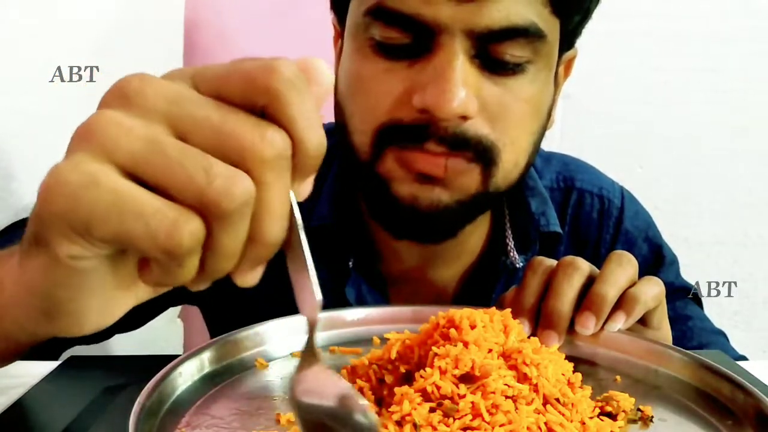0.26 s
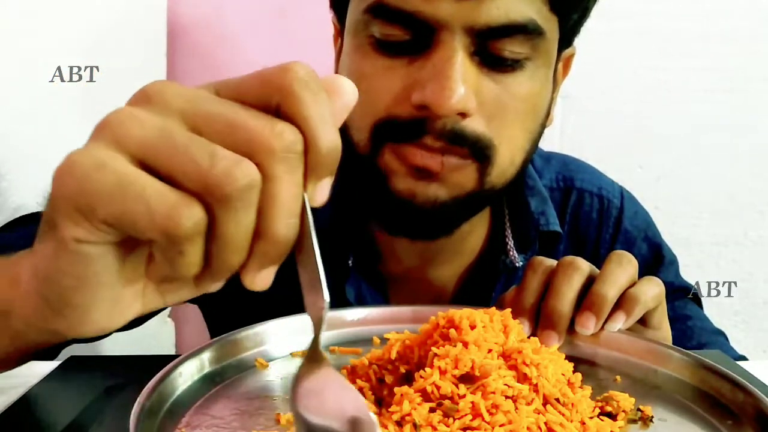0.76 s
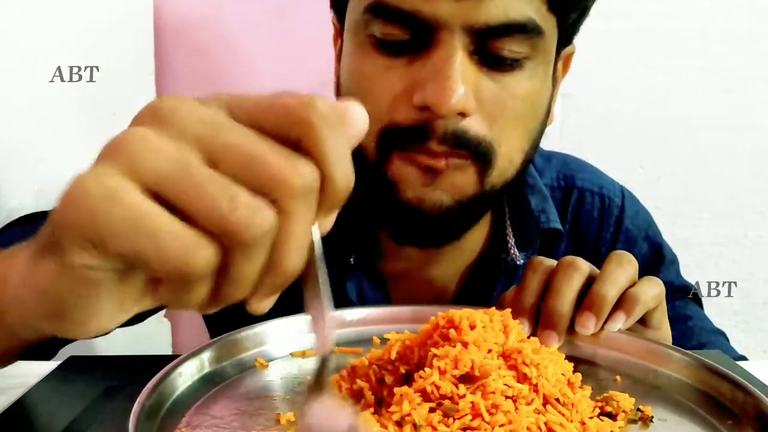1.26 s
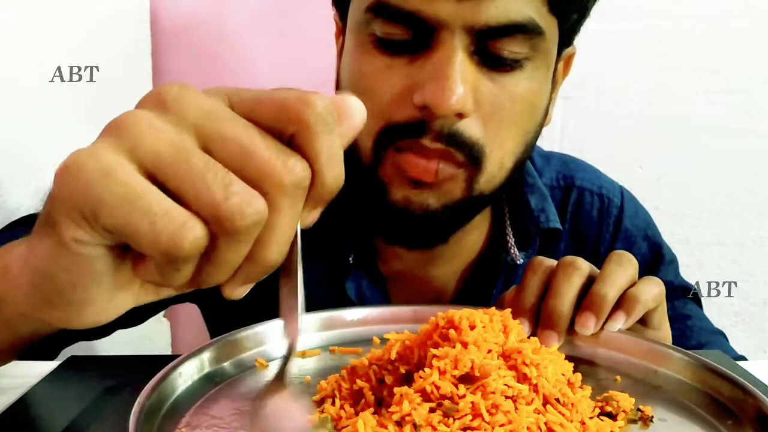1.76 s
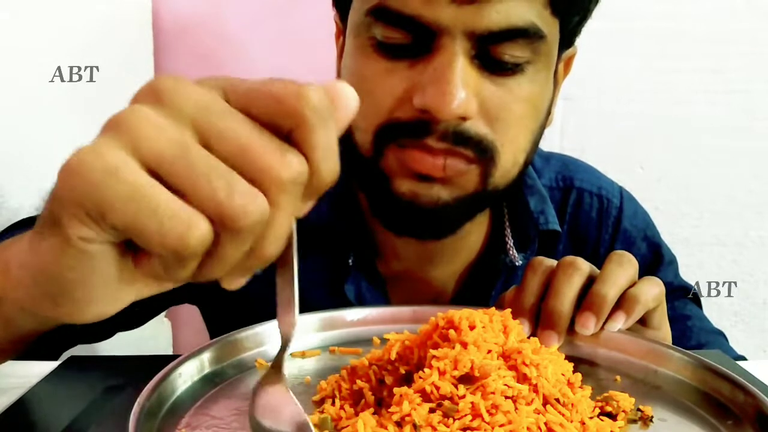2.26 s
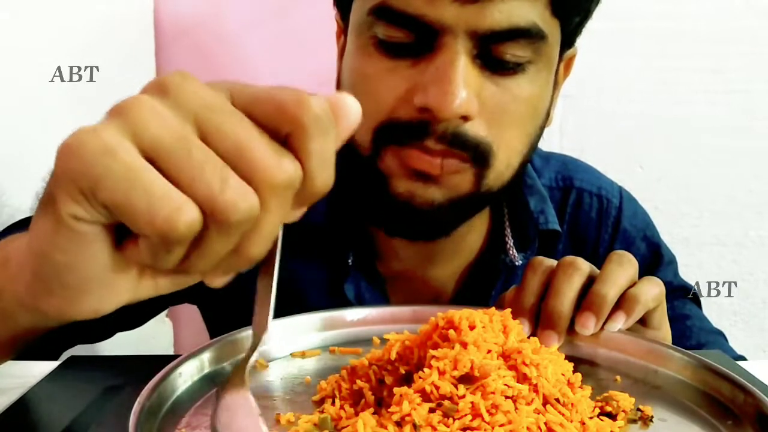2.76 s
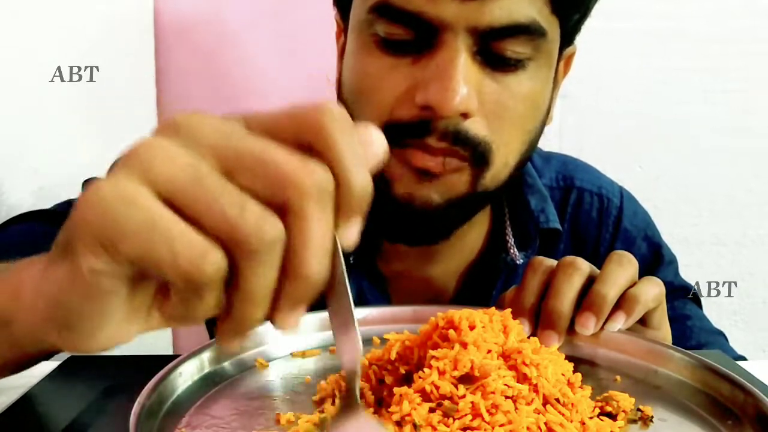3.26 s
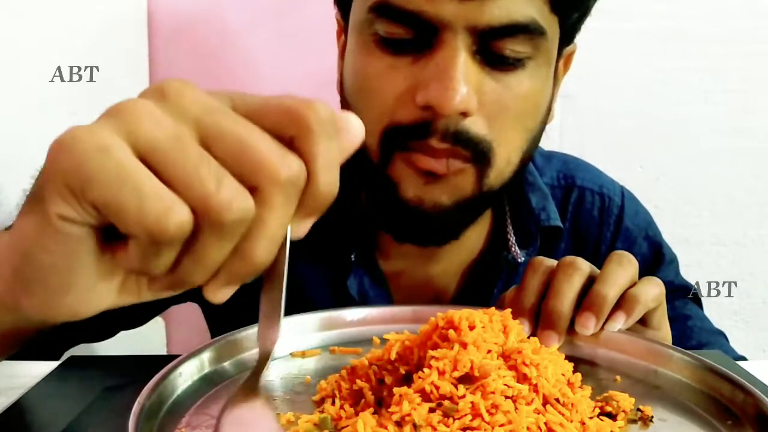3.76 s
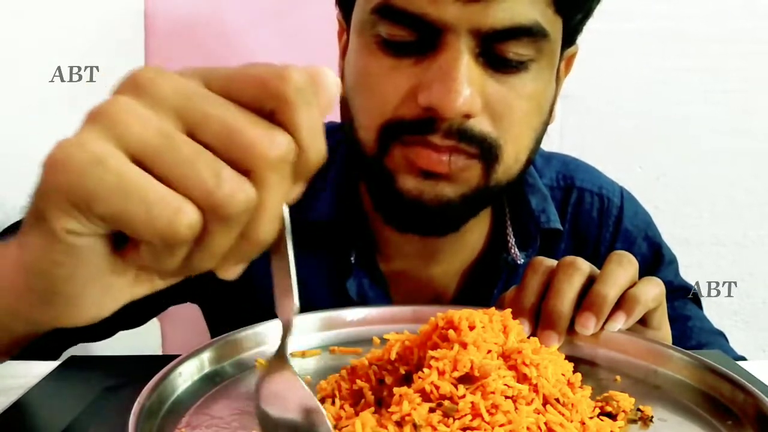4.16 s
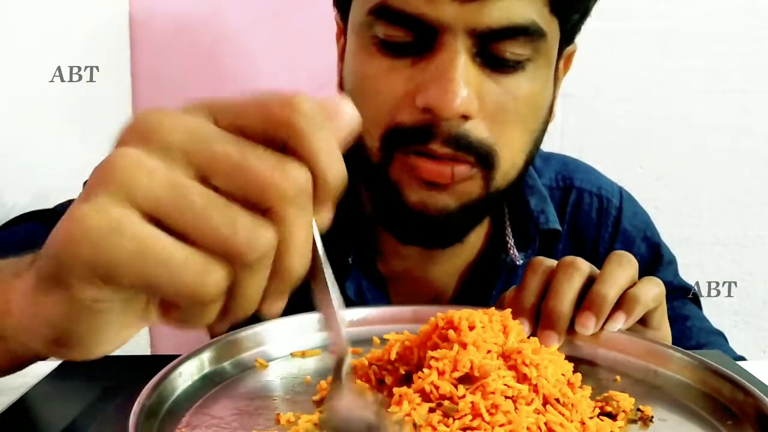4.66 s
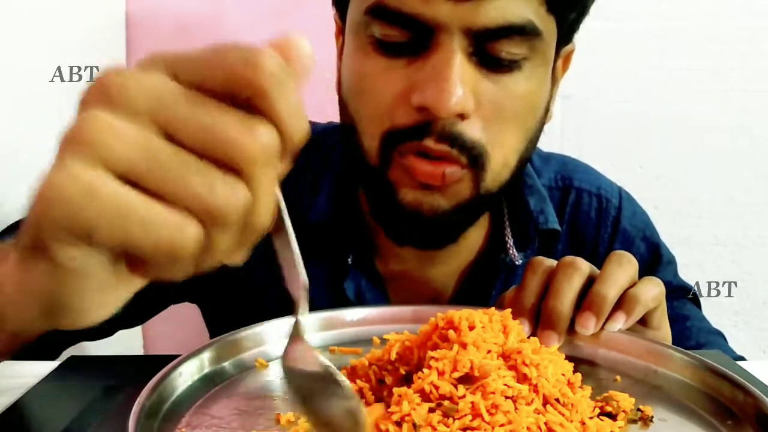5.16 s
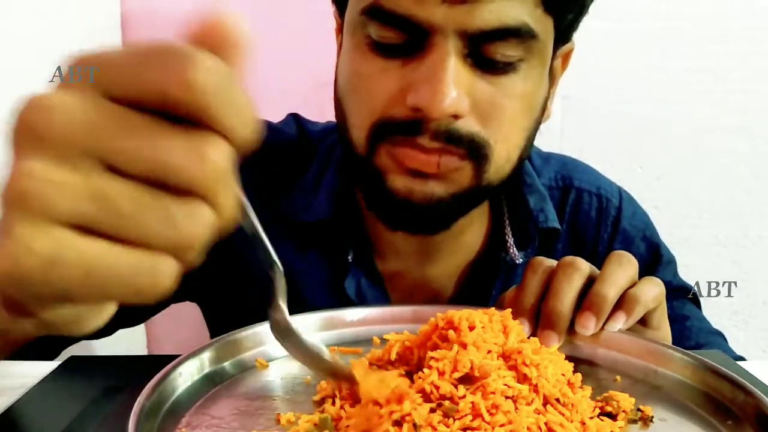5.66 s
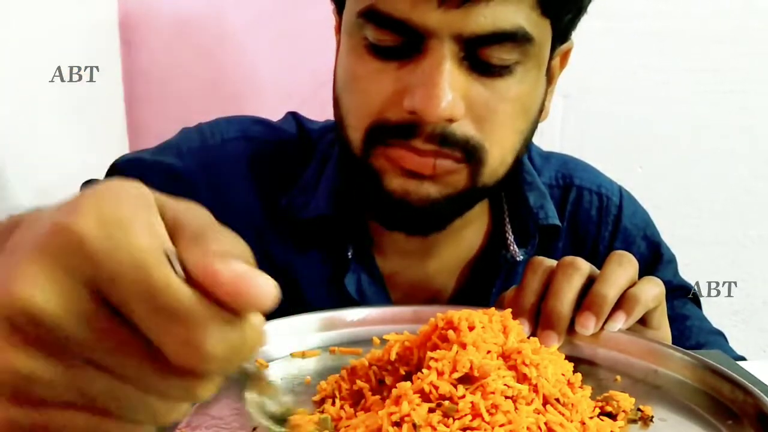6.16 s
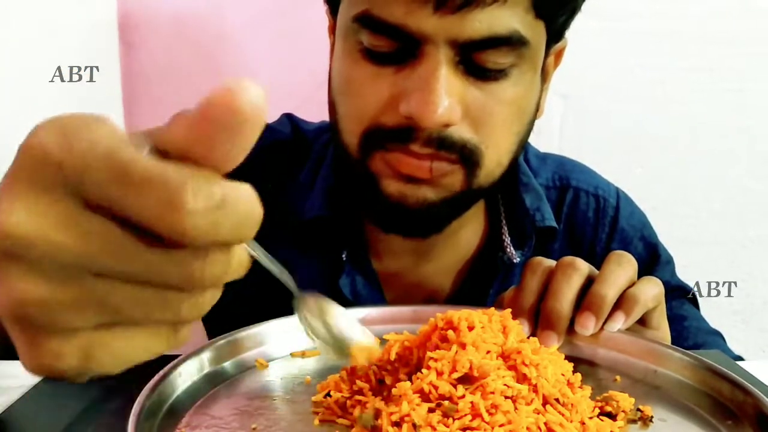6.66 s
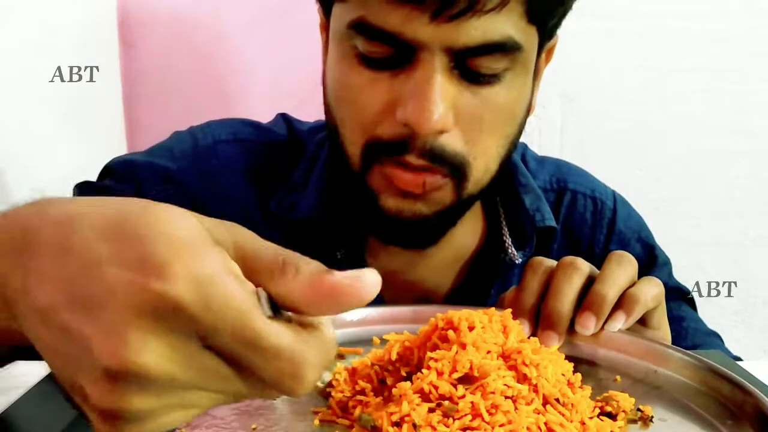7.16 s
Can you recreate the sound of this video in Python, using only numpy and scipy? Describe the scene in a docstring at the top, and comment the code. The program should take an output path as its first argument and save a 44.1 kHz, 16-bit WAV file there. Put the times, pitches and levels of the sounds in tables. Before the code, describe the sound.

A metal spoon clacks sharply and irregularly on a steel plate in a small hard room, then scrapes grittily, over a low unsteady hum.

```python
"""Spoon on a laden steel plate

A steel spoon taps and scrapes a steel plate heaped with rice, close to a phone in a small hard-walled room.
Taps are noise bursts over decaying modes, cracks that the room prolongs; scrapes are noise grains filtered
by the same modes. Faint thin tones are wavering sines. The hum is noise in low room resonances, over hiss."""
import sys
import numpy as np
from scipy import signal
from scipy.fft import rfft, irfft, next_fast_len
from scipy.io import wavfile
from scipy.ndimage import uniform_filter1d, map_coordinates

SR = 44100
rng = np.random.default_rng(int(sys.argv[2]) if len(sys.argv) > 2 else 0)


def master_out(mix):
    """Clip the mix to full scale and print it as 16-bit PCM to the path in sys.argv[1]."""
    frames = np.transpose(np.atleast_2d(mix))
    ceiling = np.clip(frames, -1, 1)
    pcm = np.round(ceiling * 32767).astype(np.int16)
    wavfile.write(sys.argv[1], SR, pcm)


N = 327663

# Blows of spoon on plate; levels are relative, body lies near 1.5 kHz and sparkle above 9 kHz:
# start_s, level_db, knock_hz, knock_db, body_db, sparkle_db
TAP_EVENTS = [(0.2714, -7.5, 636, -19, -15.5, -29.5), (1.1389, -5.5, 650, -15, -16, -27.5),
              (1.4257, 1.5, 689, -11.5, -17.5, -28), (2.9509, -4, 741, -11.5, -16, -25.5),
              (3.4956, -3, 580, -14, -17, -24), (4.0166, -10.5, 690, -17, -19.5, -29.5),
              (4.1002, -25, 760, -41.5, -23, -30), (4.4524, -8, 665, -20, -13.5, -28),
              (4.6263, -30.5, 463, -28, -25, -31), (4.8512, -18.5, 458, -46, -30, -23.5),
              (5.268, -32, 696, -1.5, -8, -28.5), (5.2953, -21, 820, -58, -31.5, -28.5),
              (5.617, -11.5, 780, -18, -16, -26.5), (5.7185, -13, 423, -46, -21.5, -29.5),
              (6.2366, -22, 446, -30, -10.5, -20.5), (7.2714, -45, 454, -39, -28, -14),
              (7.298, -19, 462, -40.5, -21, -32.5)]
# Pushes of the spoon's edge over the steel; body lies under 2.6 kHz and sparkle over 7 kHz, relative to between:
# strongest_s, swell_s, fade_s, level_db, body_db, sparkle_db, brightest_ring_hz, lowest_note_hz
SCRAPE_STROKES = [(1.836, 0.027, .012, -61.5, -13, -23.5, 3720, 3160),
                  (2.591, 0.047, 0.062, -60, -4.5, -12, 3220, 1500),
                  (2.72, 0.09, .06, -81, -3, -8.5, 4000, 1050),
                  (4.034, 0.0084, 0.036, -45.5, 4, -16, 3440, 900),
                  (4.101, .05, 0.0127, -39, -5.5, -8, 3430, 764),
                  (4.556, 0.018, 0.024, -51, -8, -16.5, 3010, 1070),
                  (4.68, 0.1, 0.072, -55, -4, -13, 3140, 1820),
                  (4.73, 0.038, 0.012, -48, -22, -19.5, 2900, 1750),
                  (4.777, 0.03, 0.032, -58.5, -9, -11, 3050, 2000),
                  (4.856, 0.015, 0.011, -48.5, 3, -17, 3240, 1550),
                  (5.298, 0.01507, 0.01, -41.5, -4, -12, 3690, 1760),
                  (5.58, 0.1, 0.02, -74.5, -6, -5, 4050, 1756),
                  (5.66, 0.016, .08, -52.5, 5, -16.5, 2960, 945),
                  (5.722, 0.068, 0.0067, -39.5, -4, -10, 3400, 1700),
                  (5.82, .05, 0.092, -68, -4, -26, 2950, 1900),
                  (5.93, 0.052, 0.033, -67.5, 3, -3.5, 3580, 2200),
                  (6.135, 0.02, .03, -74.5, -9.5, 0, 3000, 1800),
                  (6.243, 0.0043, .04, -47, -10, -15.5, 3410, 1500),
                  (6.295, 0.035, 0.084, -40.5, 5, -10, 3650, 1496),
                  (6.385, 0.057, 0.049, -39, -5, -10.5, 3630, 1044),
                  (6.5, 0.16, .035, -38.5, -5, -15, 3490, 1020),
                  (7.315, 0.018, 0.1484, -46, 2.5, -17, 3180, 1003),
                  (7.4, 0.068, 0.056, -56.5, -21, -15.5, 3296, 860)]
# Modes of plate and spoon, relative levels: pitch_hz, level_db, t60_s
STEEL_MODES = [(1180, -28.5, 0.087), (1330, -26.5, 0.044), (1517, -3, 0.025), (1769, -3.5, 0.072),
               (1933, -2, 0.018), (2100, -14, 0.078), (2450, -22, 0.077), (2619, -4.5, 0.07),
               (2750, 4.5, 0.056), (2950, 3.5, 0.016), (3100, -15.5, .05), (3312, -5.5, 0.062),
               (3528, -28, 0.021), (4080, -8.5, 0.019), (4200, -15.5, 0.092), (4620, -14, 0.099),
               (4820, -18.5, 0.03), (5880, -32.5, .05), (7770, -40, 0.025), (8780, -29, .05),
               (10040, -29, 0.033), (11750, -23, 0.055), (12930, -21.5, 0.039), (13300, -22.5, .04)]
# Spectrum of the tap's crack, relative: frequency_hz, density_db_per_hz
CRACK_SPECTRUM = [(220, -56), (380, -35.5), (480, -19.5), (560, -6), (1470, -10), (1910, 0.5), (2160, -2),
                  (3390, 0), (3660, -1), (6020, -20.5), (8330, -34), (11700, -26.5), (15500, -30.5)]
# Spectrum of the scraping, relative: frequency_hz, density_db_per_hz
GRIT_SPECTRUM = [(470, -52), (800, -16), (1030, -15), (1430, -11), (2130, -4), (2940, -11.5), (3290, -12.5),
                 (4010, -5.5), (6110, -16.5), (7270, -21), (13000, -16.5), (15500, -16)]
# Faint thin tones: start_s, length_s, pitch_hz, level_db
THIN_TONES = [(0.59, 0.034, 3130, -52), (0.625, 0.075, 3230, -61.5), (0.641, 0.13, 600, -52),
              (0.742, 0.024, 1700, -55), (0.878, 0.21, 3850, -67.5), (0.917, 0.51, 3227, -57.5),
              (1.024, 0.12, 766, -56), (1.2, 0.063, 497.6, -40), (1.286, 0.58, 3264, -49.5),
              (1.808, 0.042, 4590, -61), (1.82, 0.14, 3520, -66), (1.88, 0.12, 3870, -69),
              (2.36, 0.079, 4140, -72), (2.135, 0.082, 3440, -63), (2.401, 0.039, 1587, -61),
              (2.64, 0.31, 4090, -68), (2.566, 0.069, 2650, -58.5), (2.586, 0.014, 1510, -39.5),
              (2.609, 0.041, 2480, -54), (2.646, 0.024, 613, -50.5), (2.68, 0.019, 810, -56),
              (2.71, 0.056, 495, -45.5), (2.717, 0.028, 1050, -57), (2.734, 0.024, 1380, -57),
              (3.818, 0.13, 1042, -49.5), (3.83, 0.033, 2090, -56), (3.87, 0.042, 1840, -61.5),
              (3.956, 0.062, 2070, -59.5), (5.345, 0.016, 2240, -33), (5.554, 0.053, 4200, -67),
              (6.306, 0.044, 514, -49.5), (6.6, 0.06, 530, -50.5), (7.166, 0.024, 1158, -59),
              (7.264, 0.022, 2500, -50), (7.267, 0.031, 3550, -47)]
# Near reflections off plate rim, table and near walls, with the strong early ones thickening the first
# milliseconds of each blow: delay_ms, level_db
EARLY_ECHOES = [(1.3, 4), (2.1, -10.5), (3.2, 5.5), (4.3, -15.5), (5.6, 2.5), (7, -3), (9, -8),
                (11.5, -12.5), (14, -2), (18, -9)]
# Decay of the room's wash: frequency_hz, t60_s
ROOM_DECAY = [(400, 0.35), (1500, 0.37), (4000, 0.32), (8000, 0.36), (14000, 0.3)]
# Room resonances, for one pass of the filter: centre_hz, width_hz, gain_db
LOWEST_PEAKS = [(36, 6.3, -15), (57.9, 9.1, -4), (79.3, 5, -8.5)]
SECOND_PEAKS = [(93.7, 16, -6.5), (112.13, 9.7, 1), (132.3, 7.8, -7)]
THIRD_PEAKS = [(152.8, 14, 1.5), (186.5, 26.6, -6)]
UPPER_PEAKS = [(226, 20, 0), (291.4, 30, -8.5), (329, 15, -10.5), (359.6, 9.6, -7)]
# Level of the hum in each of these groups over time: time_s, level_db
LOWEST_HUM = [(0.0, -29.5), (0.37, -29), (0.66, -42), (0.97, -28), (1.71, -26.5), (2.46, -37.5),
              (2.52, -28), (2.96, -33), (3.33, -27), (3.74, -43), (4.12, -27), (4.22, -57), (4.26, -31.5),
              (4.57, -25.5), (5.15, -40), (5.36, -25), (5.46, -33.5), (6.08, -27.5), (6.29, -36),
              (7.43, -29)]
SECOND_HUM = [(0.0, 4), (0.04, -37.5), (2.13, -39), (2.26, -27.5), (2.44, -36), (2.94, -32.5),
              (3.43, -45.5), (3.62, -31), (3.81, -42.5), (4.01, -33.5), (4.47, -42.5), (5.13, -30),
              (6.0, -45.5), (6.83, -33), (7.39, -39), (7.43, -47)]
THIRD_HUM = [(0.0, -40.5), (0.76, -45), (1.28, -39), (2.92, -44), (3.29, -37), (3.64, -49), (4.49, -37),
             (5.09, -49.5), (5.28, -41), (6.17, -39), (6.31, -53.5), (6.52, -41.5), (7.33, -42),
             (7.43, -31)]
UPPER_HUM = [(0.0, -45), (0.04, -44), (0.81, -68.5), (0.83, -41.5), (1.78, -49), (1.88, -57.5),
             (3.17, -47.5), (3.41, -62), (3.52, -50), (3.89, -58.5), (3.93, -46), (5.07, -66),
             (5.11, -41.5), (5.57, -59.5), (5.61, -49.5), (6.21, -60), (7.41, -53), (7.43, -46)]
# Spectrum of the steady hiss, relative: frequency_hz, density_db_per_hz
HISS_SPECTRUM = [(150, -35), (250, -7.5), (318, -22.5), (359, -8), (427, -21.5), (499, -16), (615, -21),
                 (980, -24.5), (1070, -24.5), (3230, -31), (3460, -32.5), (4570, -38.5), (15600, -41.5)]

HISS_DB, TOP_HZ = -59.5, 15600  # overall hiss level; band limit of the phone
CONTACT_S = 0.0004  # the edge meets the steel over a moment, not at once
RING_DB, CRACK_DB = -32, 14  # the damped modes lie well under the crack
SWING_DB = 20  # level change over one swell or fade time
MODE_WIDTH = 0.026  # width of a rubbed mode over its pitch
NOTE_DB = -7  # strength of the lowest note in a scrape


def amp(db):
    """Level and amplitude: 20 dB is a factor of ten."""
    return 10 ** (np.asarray(db) / 20)


def unit(x):
    """Normalization to unit root-mean-square amplitude."""
    return x / np.sqrt(np.mean(x ** 2) + 1e-20)


def along(points, hz):
    """Linear interpolation of (Hz, value) points on a logarithmic frequency axis."""
    f, v = np.transpose(points)
    return np.interp(np.log(hz + 1), np.log(f + 1), v)


def wander(count, position):
    """Smooth random fluctuation: a spline through independent normal values."""
    return map_coordinates(rng.standard_normal(count), [position])


def filtered(x, response):
    """Linear filtering: the spectrum is multiplied by a complex response of frequency."""
    m = next_fast_len(len(x) + SR // 2)
    return irfft(rfft(x, m) * response(np.fft.rfftfreq(m, 1 / SR)), m)[:len(x)]


def causal(x, gain_db):
    """Minimum phase by the folded cepstrum: x is coloured without anything sounding early."""
    size = 2048
    cepstrum = irfft(np.log(amp(gain_db(np.fft.rfftfreq(size, 1 / SR))) + 1e-6))
    cepstrum[1:size // 2] *= 2
    cepstrum[size // 2 + 1:] = 0
    impulse = irfft(np.exp(rfft(cepstrum)))
    return signal.fftconvolve(x, impulse)[:len(x)]


def resonances(peaks):
    """Superposed second-order resonances of alternating polarity."""
    def response(f):
        total = 0
        for k, (centre, width, db) in enumerate(peaks):
            damping = 1j * f * width
            total = total + (-1) ** k * amp(db) * damping / (centre ** 2 - f ** 2 + damping)
        return total
    return response


def taps():
    """Impact excitation: a brief gritty blow rings damped modes at new strengths, over a low knock."""
    out, t = np.zeros(N + SR), np.arange(SR // 5) / SR
    for start_s, db, knock_hz, knock_db, body_db, sparkle_db in TAP_EVENTS:
        tilt = [(0.53 * knock_hz, knock_db + 0.5), (knock_hz, knock_db + 23), (950, knock_db + 16),
                (1400, body_db + 21), (2100, body_db + 16), (2700, 0), (6000, 0), (9000, sparkle_db + 30)]
        detune = 1 + 0.011 * rng.standard_normal(len(STEEL_MODES))  # the food lies differently each time
        spread_db = rng.normal(0, 2.5, len(STEEL_MODES))
        ring = amp(knock_db + 21.5 - 60 * t / 0.043) * np.sin(2 * np.pi * knock_hz * t)
        for (hz, level_db, t60), factor, extra_db in zip(STEEL_MODES, detune, spread_db):
            decay = amp(level_db + along(tilt, hz) + extra_db - 60 * t / t60)
            ring += decay * np.sin(2 * np.pi * hz * factor * t)
        ring *= 1 - np.exp(-t / CONTACT_S)
        burst = (t * np.exp(-t / CONTACT_S))[:256] * rng.standard_normal(256)
        grit = rfft(burst)
        blow = irfft(grit / np.abs(grit))  # every frequency equally strong
        blow = np.pad(blow, (0, len(t) - 256))
        crack = causal(blow, lambda hz: along(CRACK_SPECTRUM, hz) + along(tilt, hz))
        out[round(start_s * SR):][:len(t)] += amp(db) * (amp(RING_DB) * ring + amp(CRACK_DB) * crack)
    return out[:N]


def line(hz, centre, width):
    """Resonance curve: unity at the centre, with steep skirts."""
    return 1 / np.sqrt(1 + (2 * (hz - centre) / width) ** 4)


def friction_grains():
    """Stick-slip friction: the edge catches on tiny bumps in dense, uneven, surging grains."""
    bump_db = 3.8 * rng.exponential(1, N // 60 + 1).clip(0, 3)
    grains = rng.standard_normal(N) * amp(bump_db.repeat(60)[:N])
    grains *= amp(4 * wander(N // 250, np.arange(N) / 300))  # stick and slip in surges
    # the hand sets the force over longer times
    return grains / np.sqrt(np.abs(uniform_filter1d(grains ** 2, size=1300)))


def scrape():
    """Friction-driven resonance: uneven grains keep the steel's modes ringing, push by push."""
    hz, t, z = signal.stft(friction_grains(), SR, nperseg=1024)
    hz = hz[:, None]
    bend = 1 + 0.025 * wander(120, t * 14)  # pressing shifts the modes a little
    modes = 0
    for f, _, _ in STEEL_MODES:
        turn = amp(5 * wander(80, t * 9))  # modes take turns as the spoon travels
        modes = modes + line(hz, f * bend, MODE_WIDTH * f) * turn
    peak_s, *_, ring_hz, lowest_hz = np.transpose(SCRAPE_STROKES)
    note_hz = np.interp(t, peak_s, lowest_hz)  # both pitches glide from push to push
    bite_hz = np.interp(t, peak_s, ring_hz)
    bed = amp(along([(4000, -10), (5500, -3)], hz))  # broadband grit between the modes
    colour = amp(along(GRIT_SPECTRUM, hz)) * (bed + modes)
    colour *= 1 + amp(10.5) * line(hz, bite_hz, 560)
    colour /= 1 + (note_hz / (hz + 1)) ** 12  # little sounds below the lowest note
    colour += amp(NOTE_DB) * line(hz, note_hz, 115)
    bands = []
    for low, high in [(0, 2600), (2600, 7000), (7000, SR)]:
        inside = (hz >= low) & (hz < high)
        bands.append(unit(signal.istft(z * colour * inside, SR, nperseg=1024)[1][:N]))
    body, bite, sparkle = bands
    out, t = np.zeros(N), np.arange(N) / SR
    for s, swell, fade, db, body_db, sparkle_db, _, _ in SCRAPE_STROKES:
        on = slice(round((s - 2 * swell) * SR), round((s + 2 * fade) * SR))
        below = np.maximum((s - t[on]) / swell, (t[on] - s) / fade)
        mix = amp(body_db) * body[on] + bite[on] + amp(sparkle_db) * sparkle[on]
        out[on] += amp(db - SWING_DB * below) * mix
    return out


def tones():
    """Modulated sinusoids: thin tones start softly, waver in level and pitch, and fade."""
    out = np.zeros(N + SR)
    for start_s, length_s, hz, db in THIN_TONES:
        t = np.arange(round(length_s * SR)) / SR
        flutter_db = 3.5 * wander(150, t * 130)
        pitch_hz = hz * (1 + 0.005 * wander(150, t * 130))
        fade = np.cos(np.pi / 2 * t / length_s) ** 0.74
        shape = np.minimum(t / (0.23 * length_s), 1) * fade
        wave = np.sin(2 * np.pi * np.cumsum(pitch_hz) / SR)
        out[round(start_s * SR):][:len(t)] += amp(db + flutter_db) * shape * wave
    return out[:N]


def room(x):
    """Reverberation by convolution: near echoes and a decaying wash, in a new pattern each moment."""
    out, hop = np.zeros(N + 2 * SR), SR // 8  # the patterns change as the spoon moves about
    padded = np.pad(x, (hop, 2 * hop))
    window = signal.windows.hann(2 * hop, False)
    delay_ms, echo_db = np.transpose(EARLY_ECHOES)
    for start in range(0, N + hop, hop):
        hz, t, z = signal.stft(rng.standard_normal(SR // 2), SR, nperseg=256)
        drop_db = 130 * np.maximum(t - 0.19, 0)  # the wash falls away faster after 0.19 s
        decay = amp(-60 * t / along(ROOM_DECAY, hz)[:, None] - drop_db)
        tail = signal.istft(z * decay, SR, nperseg=256)[1]
        onset = np.minimum(np.arange(len(tail)) / (0.0083 * SR), 1)
        tail *= amp(10.5) * onset / np.linalg.norm(tail)
        jitter = rng.uniform(0.9, 1.1, len(delay_ms))
        delay = (delay_ms * jitter * SR / 1000).astype(int)
        tail[delay] += amp(echo_db) * rng.choice([-1, 1], len(delay_ms))
        wet = signal.fftconvolve(padded[start:start + 2 * hop] * window, tail)
        out[start:][:len(wet)] += wet
    return out[hop:][:N]


def hum():
    """Resonant filtering of noise: a low rumble stands in the room's resonances."""
    out = np.zeros(N)
    groups = [(LOWEST_HUM, LOWEST_PEAKS), (SECOND_HUM, SECOND_PEAKS),
              (THIRD_HUM, THIRD_PEAKS), (UPPER_HUM, UPPER_PEAKS)]
    for level, peaks in groups:
        response = resonances(peaks)
        band = filtered(rng.standard_normal(N), lambda hz: response(hz) ** 2)  # two passes
        swing = np.sqrt(np.abs(uniform_filter1d(band ** 2, SR // 12)))
        steady = unit(band / (swing + 0.22 * band.std()))  # driven steadily, so few deep gaps
        out += amp(np.interp(np.arange(N) / SR, *np.transpose(level))) * steady
    return out


def hiss():
    """Stationary noise: a fixed spectrum at constant strength."""
    noise = filtered(rng.standard_normal(N), lambda hz: amp(along(HISS_SPECTRUM, hz)))
    return amp(HISS_DB) * unit(noise)


def scene():
    """Superposition of direct sound, room response and background; the thin tones excite the room less."""
    spoon, thin = taps() + scrape(), tones()
    wet = room(spoon + amp(-15) * thin)
    return (spoon + thin + wet + hum() + hiss())[None]


def record(dry):
    """Band limitation: the phone keeps nothing at or above its band limit."""
    return filtered(dry[0], lambda hz: hz < TOP_HZ)[None]


dry = scene()
out = record(dry)
master_out(out)
```